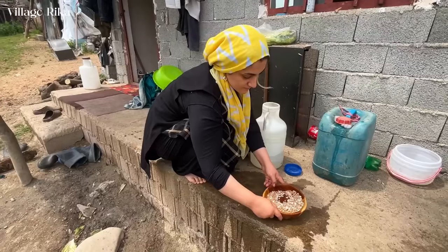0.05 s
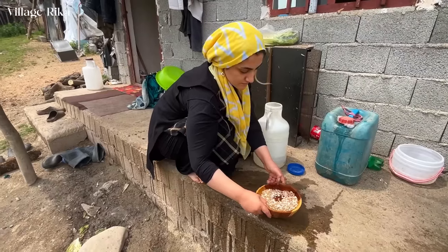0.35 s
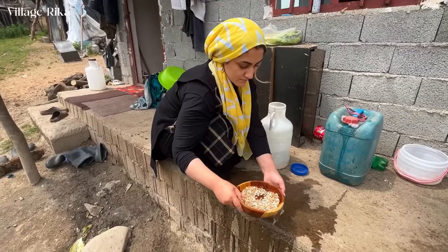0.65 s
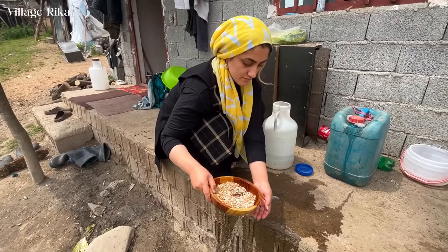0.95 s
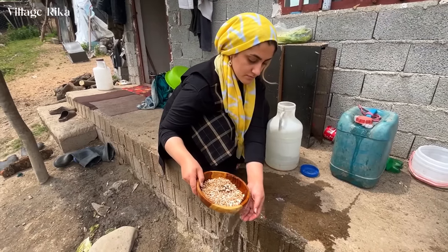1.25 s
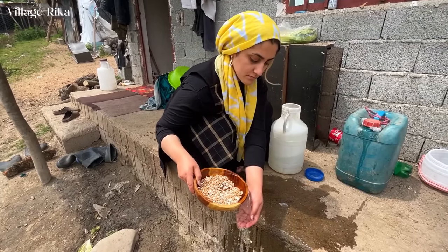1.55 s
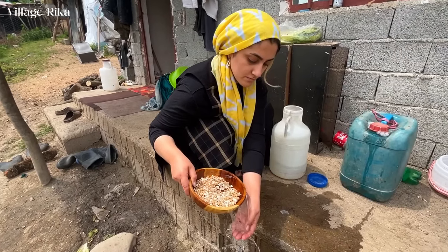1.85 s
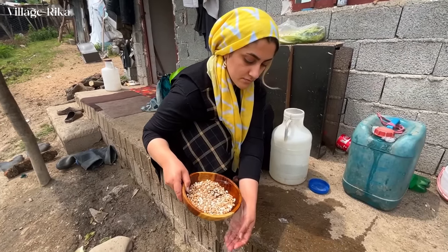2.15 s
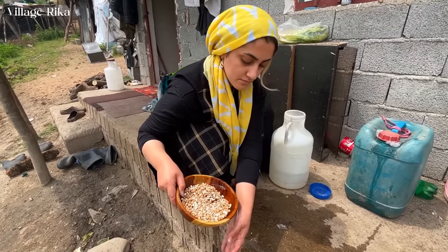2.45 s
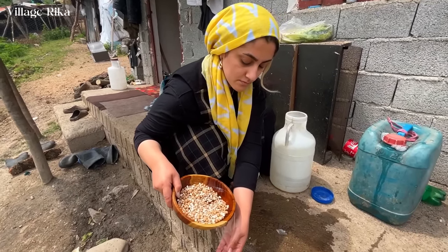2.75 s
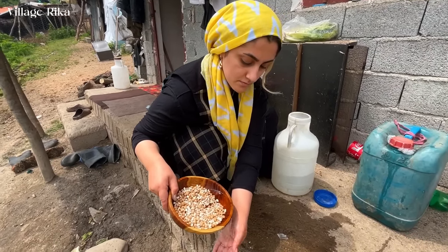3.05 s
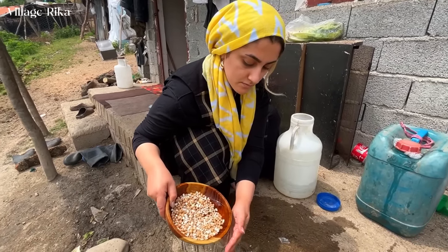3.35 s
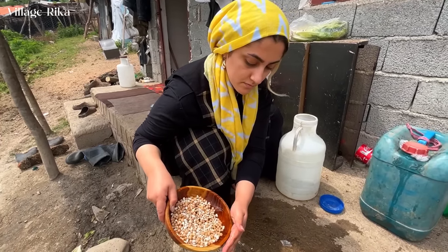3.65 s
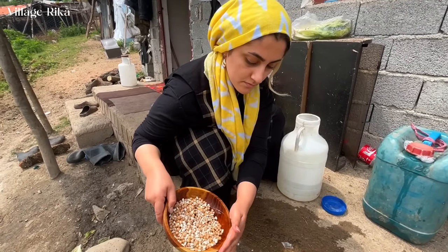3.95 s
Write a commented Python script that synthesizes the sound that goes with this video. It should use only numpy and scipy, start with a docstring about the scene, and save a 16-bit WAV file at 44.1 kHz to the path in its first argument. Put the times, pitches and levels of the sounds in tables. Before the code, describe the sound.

Water spatters onto a concrete step as a bowl of beans is drained. After faint ticks from the bowl, drips grow into a broken stream plopping into a puddle, then thin again, close by in a quiet yard.

```python
"""Water is drained from a bowl of wet beans, past a hand, onto the concrete step of a yard.
First the bowl ticks faintly as it is picked up, over outdoor air and a low hum that last throughout.
Near 1 s the first drips land, each impact a wet slap with a short ring and a spray of droplets.
From 1.5 s a broken stream spatters in clumps and plops into the puddle, where bubbles resonate.
After 3.5 s the stream thins to drips again."""
import sys
import numpy as np
from scipy import signal
from scipy.fft import rfft, irfft
from scipy.io import wavfile
from scipy.ndimage import uniform_filter1d

SR = 44100
rng = np.random.default_rng(int(sys.argv[2]) if len(sys.argv) > 2 else 0)


def unload_audio(sound):
    """Save the sound as a 16-bit wav file, at the path given as the first command line argument."""
    columns = np.transpose(np.atleast_2d(sound))
    # keep every value between -1 and 1, then stretch to whole-number steps
    steps = np.round(np.clip(columns, -1, 1) * 32767)
    wavfile.write(sys.argv[1], SR, steps.astype(np.int16))


N = 176400
TIME, FREQ = np.arange(N) / SR, np.fft.rfftfreq(N, 1 / SR)
LEAD_S, TREBLE_EDGE_HZ = 0.006, 5500


def amp(db):
    """Amplitude ratio of a level in decibels."""
    return 10 ** (np.asarray(db) / 20)


def unit(x):
    """Normalisation of each channel to unit energy."""
    return x / np.sqrt(np.sum(x ** 2, -1, keepdims=True) + 1e-20)


def spectrum(points):
    """Interpolation of a table over logarithmic frequency."""
    f, value = np.transpose(points)
    return np.interp(np.log(FREQ + 1), np.log(f + 1), value)


def add(mix, start_s, sound):
    """Superposition of a sound on the mix."""
    part = mix[:, max(round(start_s * SR), 0):][:, :sound.shape[1]]
    part += sound[:, :part.shape[1]]


def splat(ring_hz, ring_db, treble_db, rise_oct, size=2048):
    """A drop's impact, LEAD_S in, radiates a broadband slap, spray and a damped ring of rising pitch."""
    slap_rise_s, slap_decay_s, slap_hz, width_oct = 0.0003, 0.0011, 4200, 1.71
    spray_rise_s, spray_decay_s, spray_per_s, spray_db = 0.0016, 0.004, 2700, -3
    clock, f = np.arange(size) / SR - LEAD_S, np.fft.rfftfreq(size, 1 / SR) + 1
    t = np.maximum(clock, 0)
    pulse = (1 - np.exp(-t / slap_rise_s)) * np.exp(-t / slap_decay_s)
    slap = unit(rng.choice([-1., 1.], (2, size)) * pulse)
    cloud = np.exp(np.minimum(clock, 0) / spray_rise_s - t / spray_decay_s)
    spray = unit(rng.standard_normal((2, size)) * (rng.random(size) < spray_per_s / SR) * cloud)
    treble = amp(treble_db) / (1 + (TREBLE_EDGE_HZ / f) ** 8)
    centre_hz = np.sqrt(ring_hz * slap_hz)
    body = 1 / (1 + (np.log2(f / centre_hz) / width_oct) ** 2)
    wet = unit(irfft(rfft(slap + amp(spray_db) * spray) * (body + treble)))
    age = t * ring_hz / 1.72  # the ring peaks after 1.72 periods of ring_hz
    cycles = np.cumsum(ring_hz * np.exp2(rise_oct * np.tanh(age / 2 - .7))) / SR
    ring = unit(age * np.exp(-age) * np.sin(2 * np.pi * (cycles + rng.random((2, 1)))))
    return unit(wet + amp(ring_db) * ring)


def big_splats():
    """Impact noise dominates on the hard step, bubble resonance in the puddle."""
    # gouts slapping the concrete (time [s], level [dB])
    gouts = [(0.9507,-17.5),(1.039,-9),(1.126,-18.5),(1.2107,-10.5),(1.3722,-15.5),(1.453,-10),(1.5011,-12.5),(1.5136,0.5),(1.5658,-7),(1.7508,-1.5),(1.8309,-15),(1.8448,0.5),(1.8847,-10.5),(2.0448,-8.5),(2.1171,-9),(2.1025,-8),(2.1838,-4),(2.243,-10),(2.317,-4),(2.3522,-5.5),(2.424,-1),(2.651,-12),(2.6636,-3),(2.7466,-5.5),(2.8916,-6.5),(2.9301,-7),(2.9895,-3.5),(3.218,-8),(3.3713,-5),(3.4802,-6),(3.5572,-11.5),(3.6998,-20),(3.8498,-5)]
    # fast droplets bursting with a bright tick (time [s], level [dB])
    specks = [(0.968,-19),(1.17,-16.5),(1.2835,-11.5),(1.6036,-5),(1.9748,-4.5),(2.148,-15),(2.1959,-5),(2.5914,-8),(3.3595,-8.5),(3.4556,-4),(3.5996,-12.5),(3.6467,-11),(3.8638,-12.5),(3.9835,-8.5)]
    # drops entering the puddle (time [s], level [dB], bubble frequency [Hz])
    plops = [(1.6342,-11.5,2866),(2.1751,-8,3830),(2.198,-9,2140),(2.3889,-6.5,2010),(2.48,-3.5,4010),(2.5107,-3,1804),(2.632,-1.5,3360),(2.7643,-9,2816),(2.7836,-6,3920),(2.8298,-3.5,2953),(2.9501,-5,3482),(3.0527,-3,4977),(3.1384,3.5,2712),(3.1498,-3,1900),(3.7473,-12.5,3855),(3.9334,-2.5,2666)]
    out = np.zeros((2, N))
    for s, db in gouts:
        ring_hz = rng.uniform(4369, 6276)
        add(out, s - LEAD_S, amp(db) * splat(ring_hz, ring_db=-2.5, treble_db=-22, rise_oct=0.1918))
    for s, db in specks:
        add(out, s - LEAD_S, amp(db) * splat(ring_hz=10500, ring_db=-2.5, treble_db=0.5, rise_oct=0.194))
    for s, db, hz in plops:
        add(out, s - LEAD_S, amp(db) * splat(hz, ring_db=3.5, treble_db=-18, rise_oct=0.589))
    return out


def flow_db():
    """The stream's envelope in decibels, which modulates the drops and the mist."""
    # water reaching the ground (time [s], level [dB])
    flow = [(.93, -66), (.96, -11), (1.02, -8), (1.26, -22), (1.41, -14), (1.46, -.5), (1.78, 0),
            (1.92, -2), (2.02, 0), (2.2, -1.5), (2.28, -8), (2.41, 4.5), (2.5, 0), (2.65, 7), (2.72, -4),
            (2.85, 5), (2.92, -8), (3.04, -2.5), (3.11, -10), (3.15, -2.5), (3.23, 3.5), (3.37, -7.5),
            (3.43, -7), (3.46, 5.5), (3.57, -9), (3.74, -16), (4, -4)]
    return np.interp(TIME, *np.transpose(flow))


def drops(candidates=1200):
    """Breakup of the stream gives random small impacts, denser and louder as the flow grows."""
    centre_hz, spread_oct, spread_db = 5212, 1.5, 24
    base_per_s, base_db = 200, -6.5  # at a flow level of 0 dB
    out, flow = np.zeros((2, N)), flow_db()
    for k, (jitter, chance, smallness, up, down, bright) in enumerate(rng.random((candidates, 6))):
        at = int((k + jitter) / candidates * (N - 1))
        hz = centre_hz * 2 ** (spread_oct * (up - down))
        sound = splat(hz, ring_db=-5, treble_db=10 * (bright - 1), rise_oct=0.3976)
        if chance < base_per_s * N / SR / candidates * amp(.45 * flow[at]):
            level_db = base_db + 0.73 * flow[at] - spread_db * smallness
            add(out, at / SR - LEAD_S, amp(level_db) * sound)
    return out


def mist():
    """Shot noise: countless tiny droplets merge into a fizz that follows the flow."""
    droplets_per_s, base_db, spread_db, tilt_db_per_oct = 3300, -47, 7.5, 2.5
    strength = amp(spread_db * np.minimum(rng.exponential(1, N), 4))
    hits = rng.random(N) < droplets_per_s / SR
    clicks = rng.standard_normal((2, N)) * strength * hits * amp(base_db + flow_db())
    return irfft(rfft(clicks) * amp(tilt_db_per_oct * np.log2((FREQ + 1) / TREBLE_EDGE_HZ)), N)


def wall_echo(x, level_db=-13.5, t60_s=0.069, delay_s=0.0022, size=16384):
    """Scattering from the block wall and the ground returns exponentially decaying reflections."""
    t = TIME[:size]
    taps = rng.standard_normal((2, size)) * (rng.random((2, size)) < .08) * (t > delay_s)
    response = unit(taps * amp(-60 * t / t60_s))
    return amp(level_db) * signal.fftconvolve(x, response, axes=1)[:, :N]


def bowl_ticks(decay_s=0.0054):
    """Light contacts excite noisy, heavily damped vibrations of the bowl."""
    # contacts as the bowl is picked up (time [s], level [dB], ring frequency [Hz])
    ticks = [(0.16, -49, 423), (0.217, -61, 12000), (0.487, -54.5, 4860)]
    out, t = np.zeros((2, N)), TIME[:2048]
    for s, db, hz in ticks:
        grain = unit(uniform_filter1d(rng.standard_normal((2, len(t))), int(SR / hz))) * np.sqrt(len(t))
        add(out, s, amp(db) * grain * np.exp(-t / decay_s) * np.sin(2 * np.pi * hz * t))
    return out


def blip(at_s=1.949, hz=826, half_width_s=0.011, level_db=-47.5):
    """A sinusoid under a Gaussian envelope is heard as one faint, round tone."""
    envelope = np.exp(-((TIME - at_s) / half_width_s) ** 2)
    return amp(level_db) * envelope * np.sin(2 * np.pi * hz * TIME)


def yard(air_db=-58, hum_db=-58.5, hum_hz=63.6, hum_width_hz=18.2):
    """Broadband noise is heard as outdoor air, narrowband noise as a low, wavering hum."""
    # spectrum of the air (frequency [Hz], relative level [dB])
    air_colour = [(25, -27), (60, -13), (115, -11), (190, -22), (280, -21), (600, -29), (1050, -29),
                  (1270, -25), (1500, -29.5), (3600, -36.5), (4750, -25.5), (7800, -40.5), (11000, -37.5),
                  (15000, -41)]
    # swell of the hiss above about 900 Hz (time [s], gain [dB])
    swell = [(0, -16.5), (.25, -12.5), (.55, -7.5), (1.5, -5)]
    air = unit(irfft(rfft(rng.standard_normal((2, N))) * amp(spectrum(air_colour)), N))
    hiss = irfft(rfft(air) / (1 + (900 / (FREQ + 1)) ** 2), N)
    air += hiss * (amp(np.interp(TIME, *np.transpose(swell))) - 1)
    hum_band = np.exp(-((FREQ - hum_hz) / hum_width_hz) ** 2)
    hum = unit(irfft(rfft(rng.standard_normal((2, N))) * hum_band, N))
    return np.sqrt(N) * (amp(air_db) * air + amp(hum_db) * hum)


def microphone_ports(x):
    """Partial coherence: two ports share part of the sound, each with its own colour and phase."""
    # left port relative to right (frequency [Hz], level [dB])
    balance = [(100, 1.5), (1600, 7), (2700, -0.5), (3700, 2), (5300, 12), (6500, 7), (8000, 4.5),
               (9400, -8), (11000, 0)]
    # likeness of the ports (frequency [Hz], shared amplitude [ratio])
    likeness = [(60, .96), (400, .5), (1500, .83), (2800, .76), (7800, .3), (11500, .87)]
    # delay of the right port (frequency [Hz], phase lag [rad])
    lag = [(2200, 0), (4400, 2.1), (6700, 6), (8900, 6.1), (9800, 8), (10900, 6.4), (12500, 6),
           (15500, 3.1)]
    left, other = rfft(x)
    shared, side = np.clip(spectrum(likeness), 0, 1), amp(spectrum(balance) / 2)
    right = (shared * left + np.sqrt(1 - shared ** 2) * other) * np.exp(-1j * spectrum(lag))
    rms_gain = np.sqrt((side ** 2 + side ** -2) / 2)
    return irfft(np.array([left * side, right / side]) / rms_gain, N)


def scene():
    """The water, its reflections and the background superpose at the microphone."""
    # colour of water hitting concrete (frequency [Hz], gain [dB])
    splash_colour = [(150, 1), (500, -17.5), (900, -2.5), (1250, -5), (1600, -0.5), (2150, -4), (2700, -1),
                     (4700, 3.5), (6300, 2), (7800, -9), (9000, 1.5), (10300, -2), (13500, -3), (15700, -7)]
    water = irfft(rfft(big_splats() + drops() + mist()) * amp(spectrum(splash_colour)), N)
    return microphone_ports(water + wall_echo(water) + bowl_ticks() + blip() + yard())


def record(dry):
    """A linear-phase low-pass filter limits the bandwidth."""
    cutoff_hz = 15950
    lowpass = signal.firwin(511, cutoff_hz, window=("kaiser", 9), fs=SR)
    return signal.oaconvolve(dry, lowpass[None], "same")


dry = scene()
out = record(dry)
unload_audio(out)
```